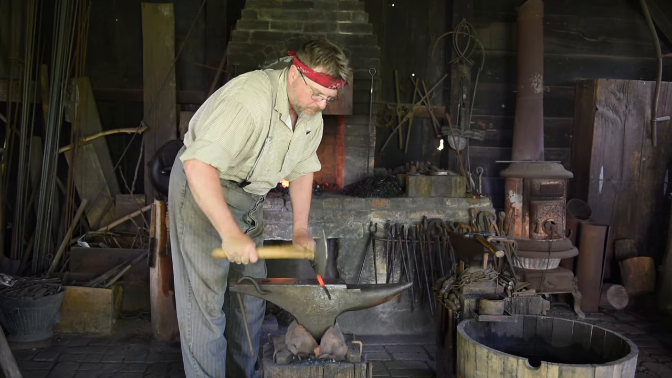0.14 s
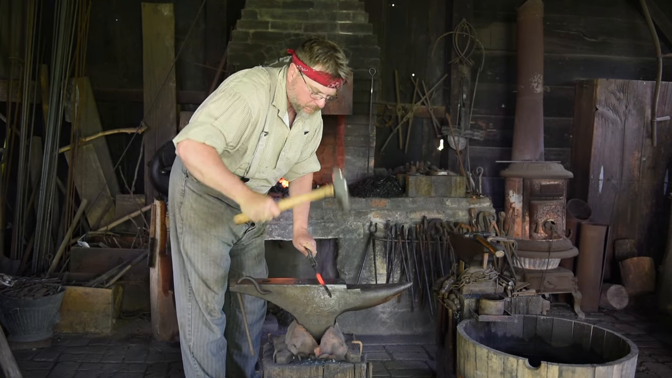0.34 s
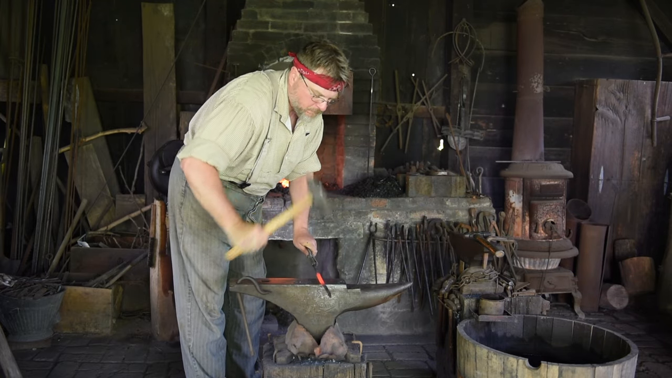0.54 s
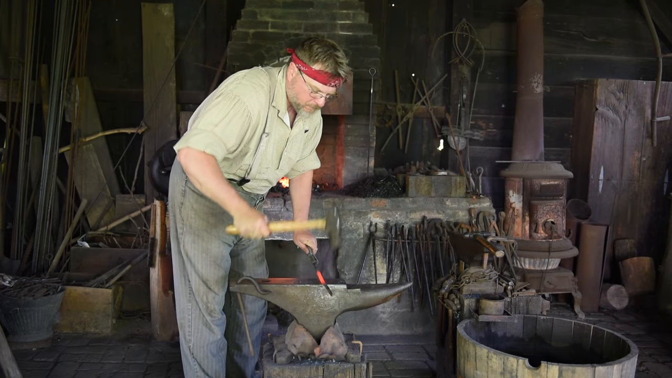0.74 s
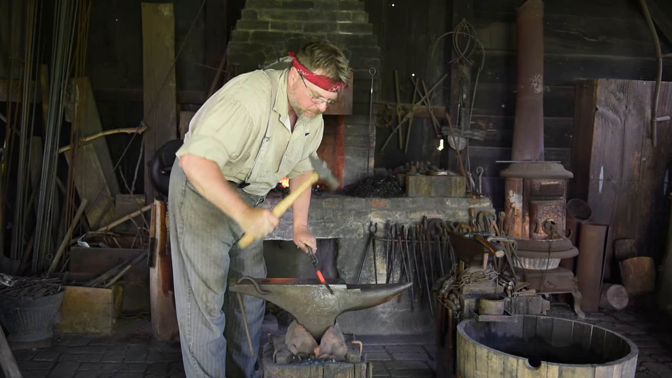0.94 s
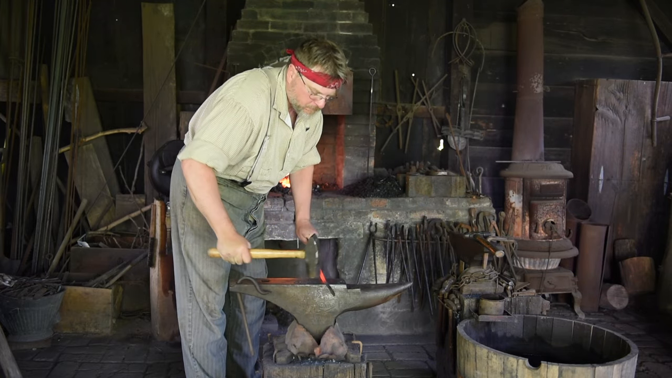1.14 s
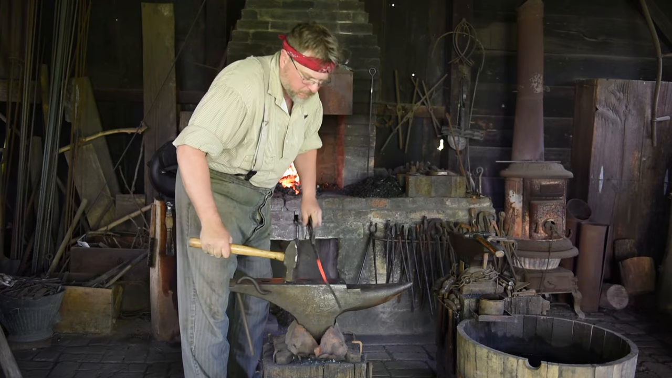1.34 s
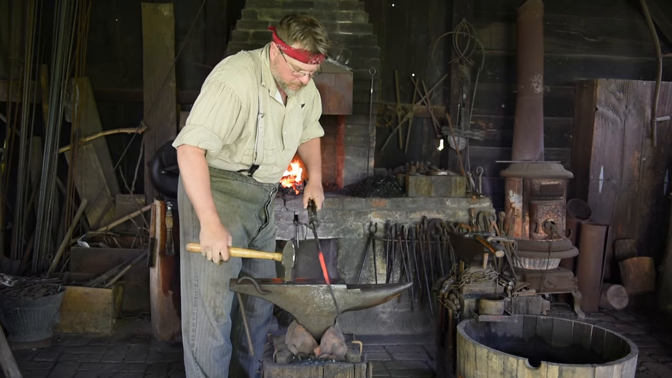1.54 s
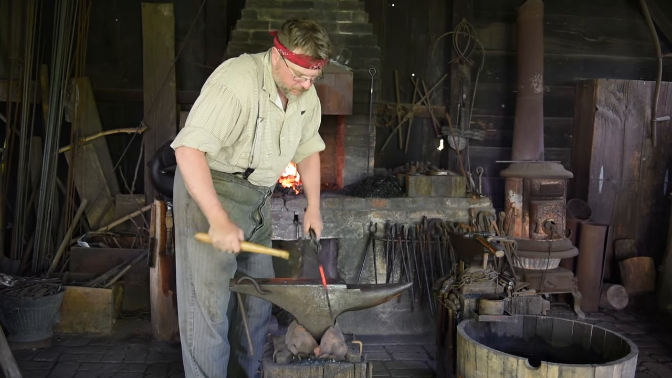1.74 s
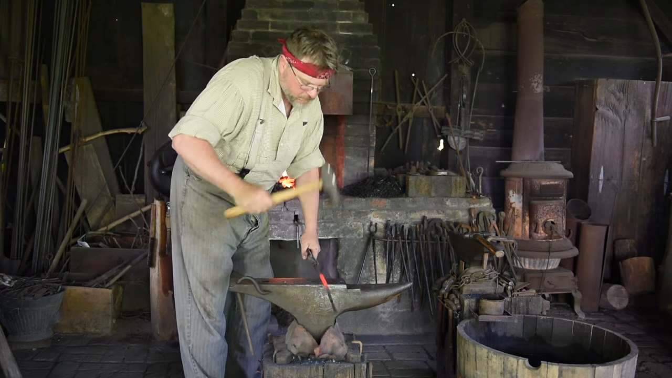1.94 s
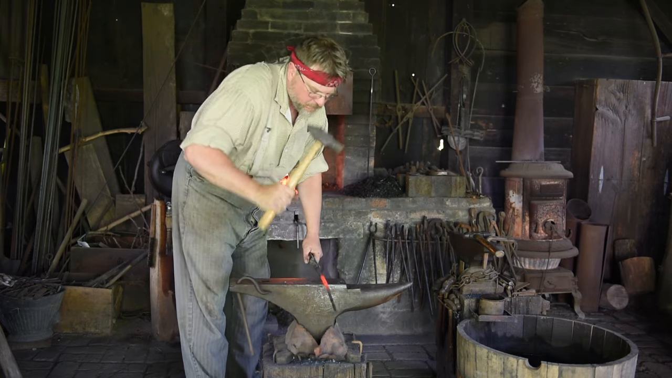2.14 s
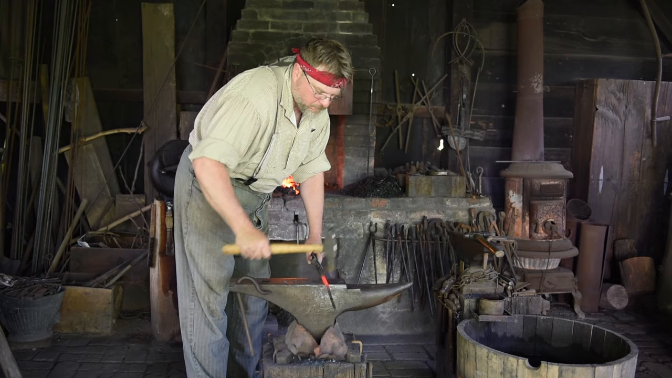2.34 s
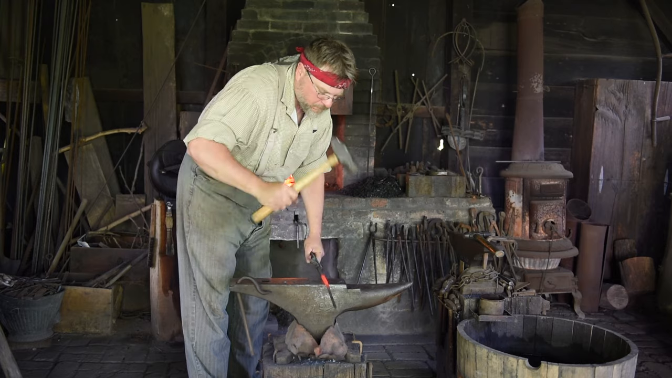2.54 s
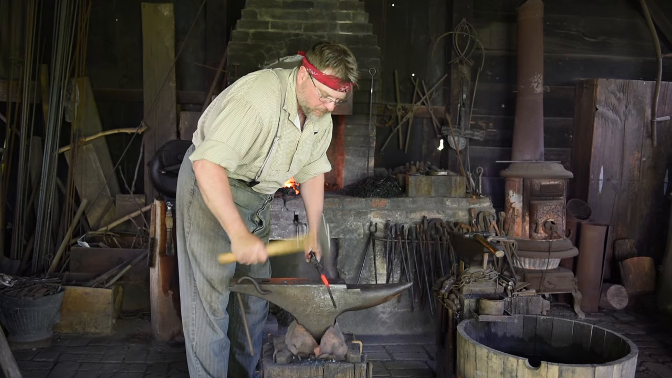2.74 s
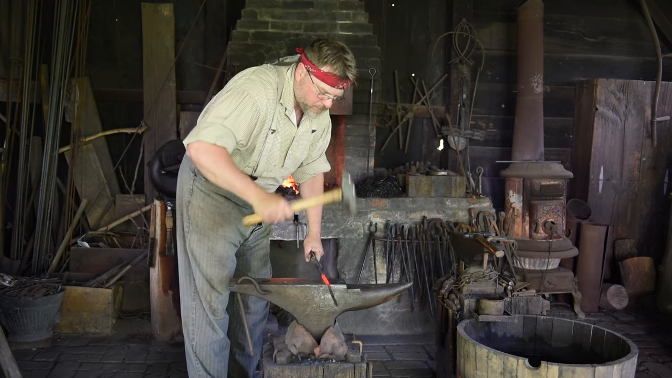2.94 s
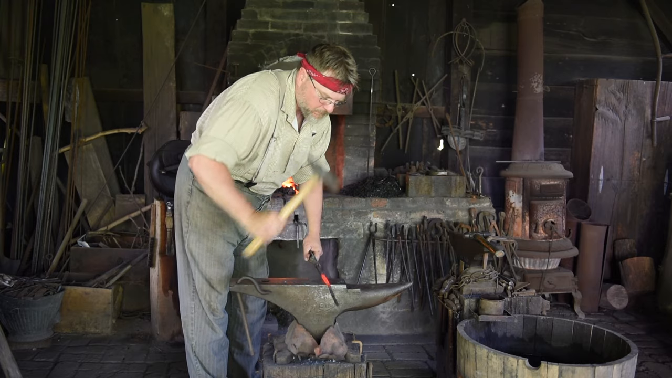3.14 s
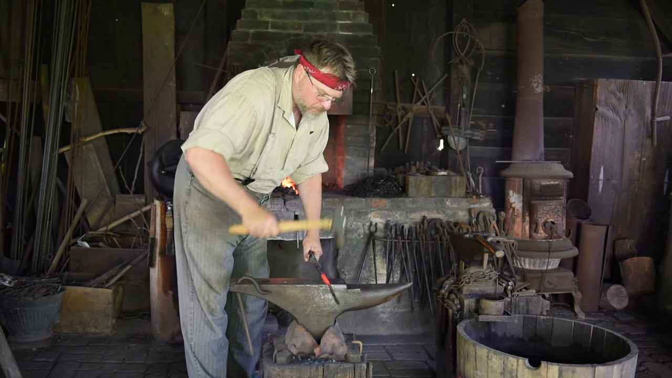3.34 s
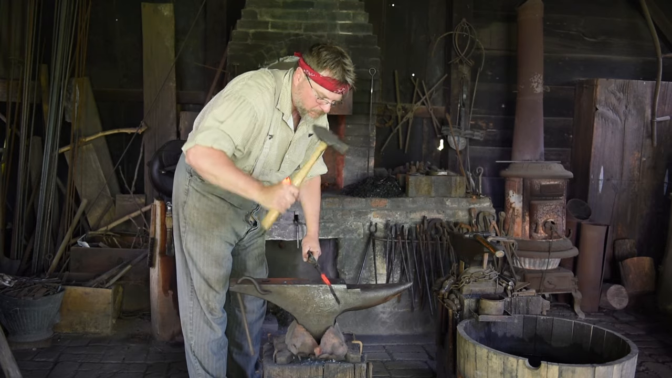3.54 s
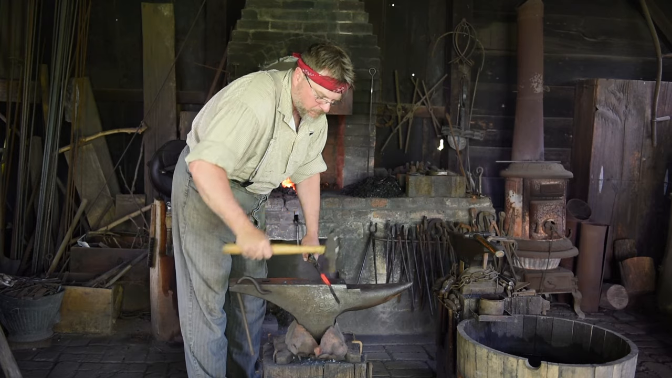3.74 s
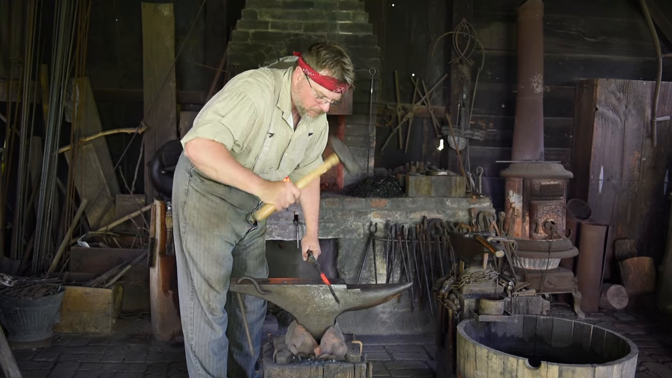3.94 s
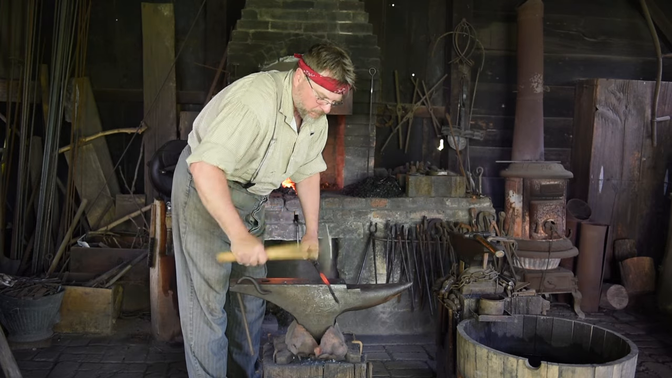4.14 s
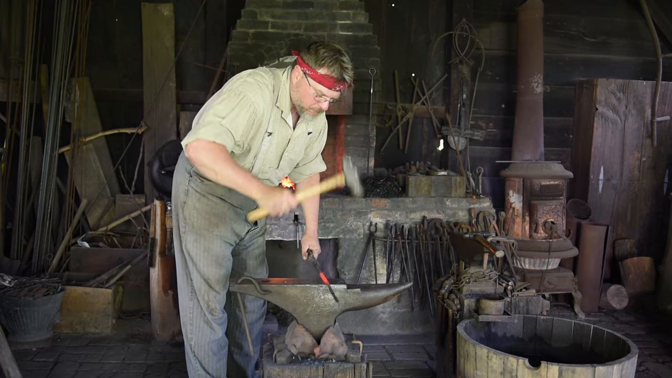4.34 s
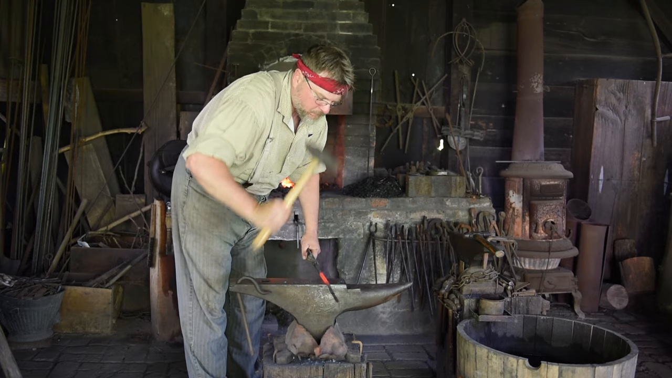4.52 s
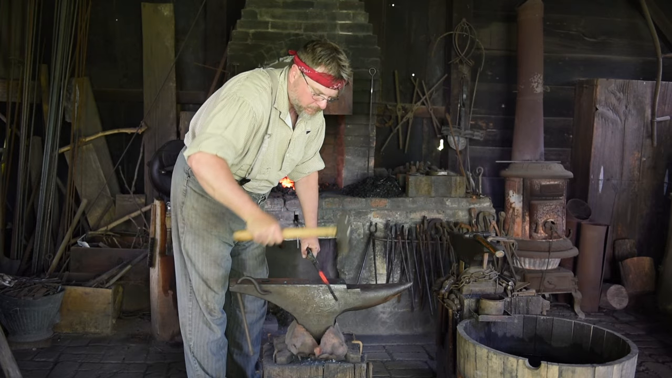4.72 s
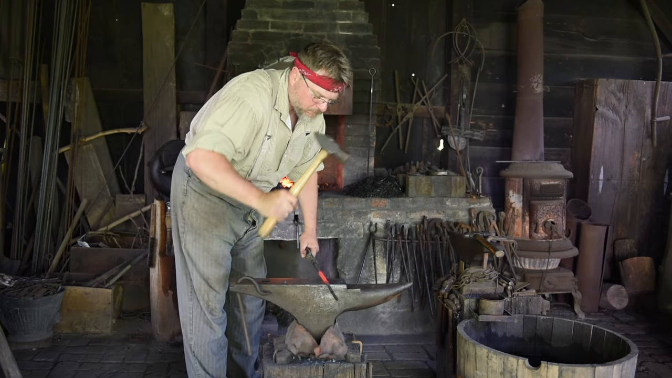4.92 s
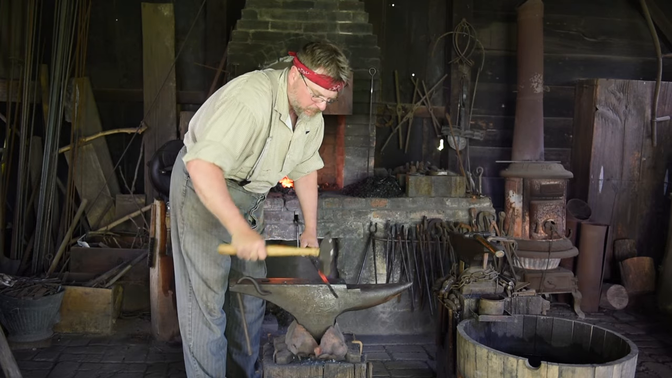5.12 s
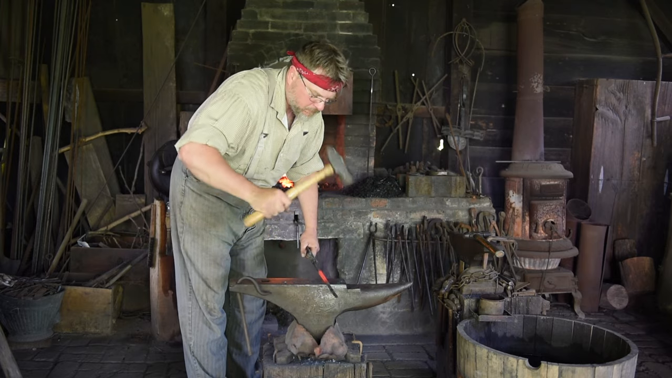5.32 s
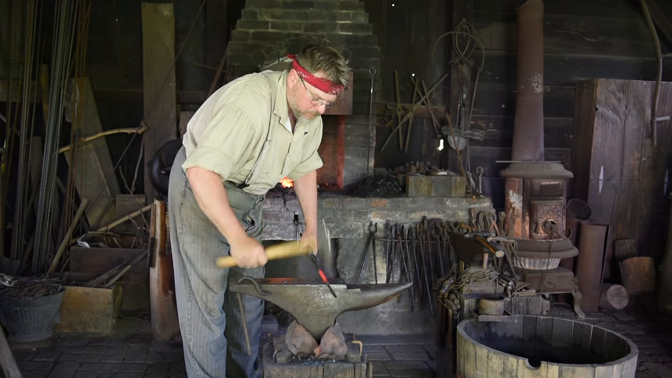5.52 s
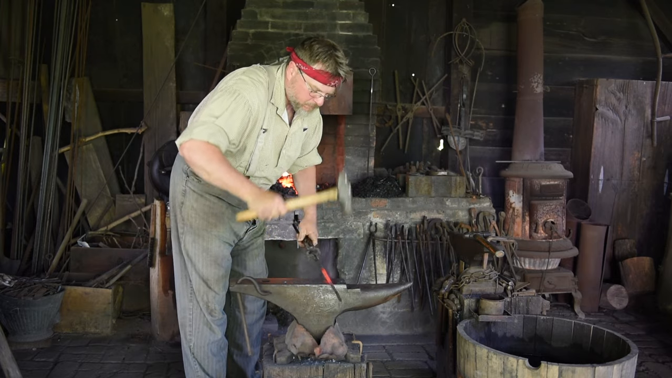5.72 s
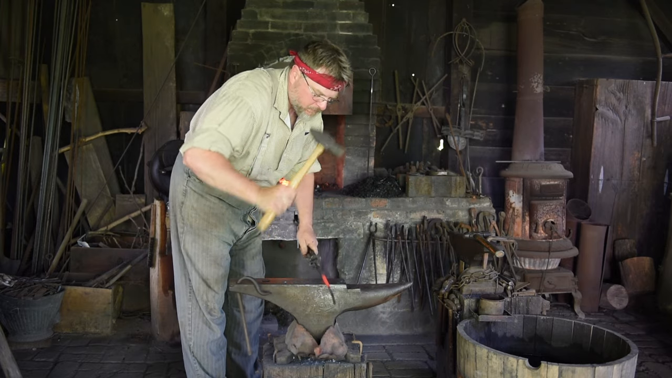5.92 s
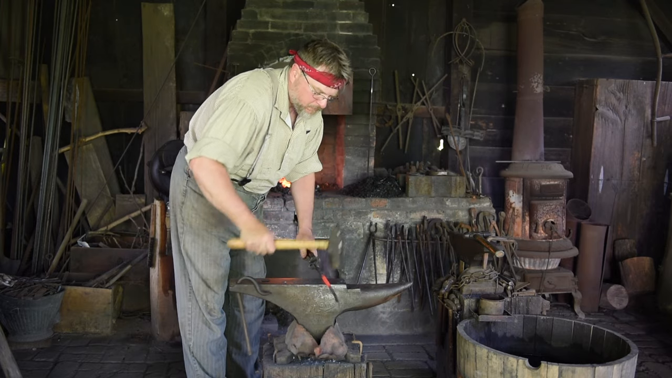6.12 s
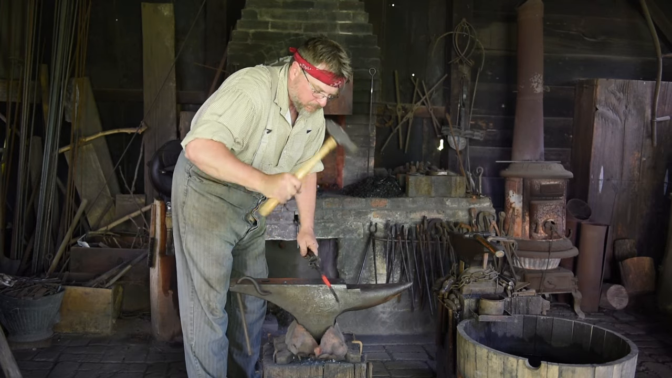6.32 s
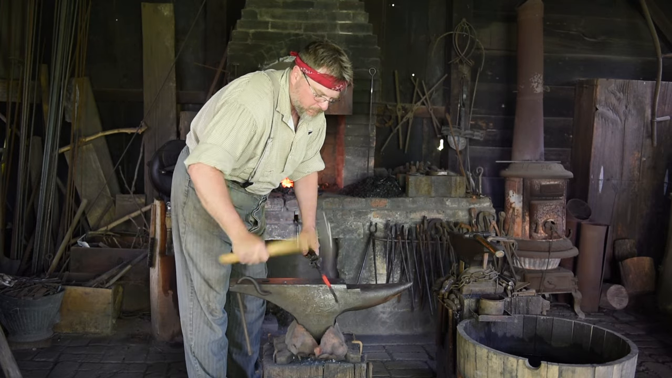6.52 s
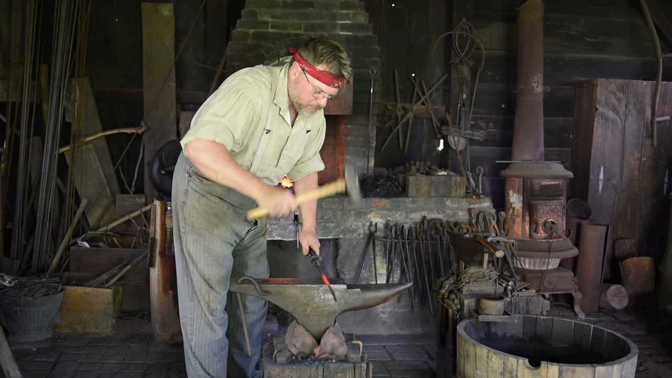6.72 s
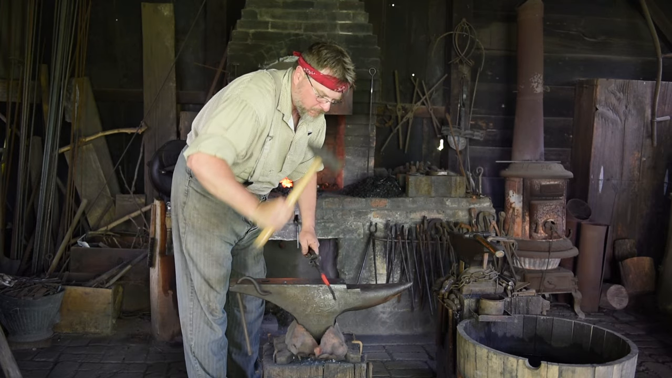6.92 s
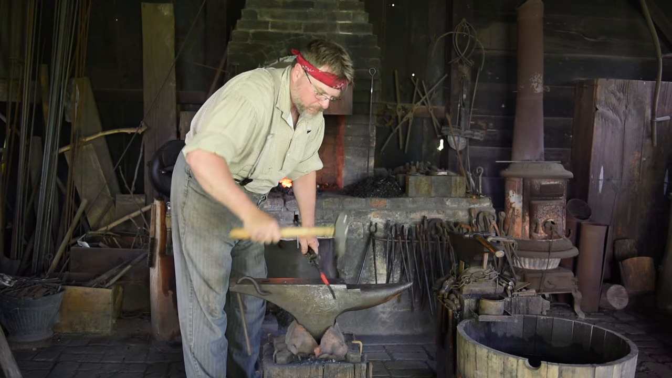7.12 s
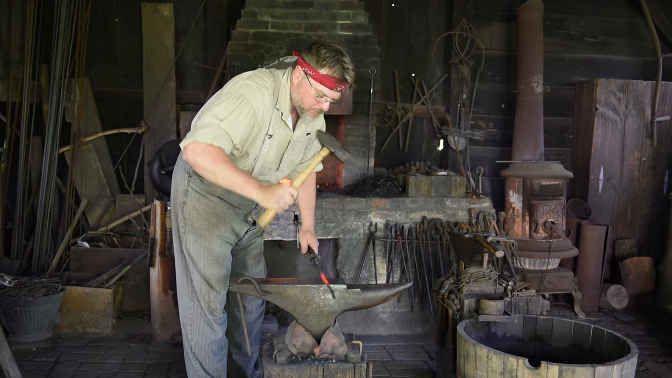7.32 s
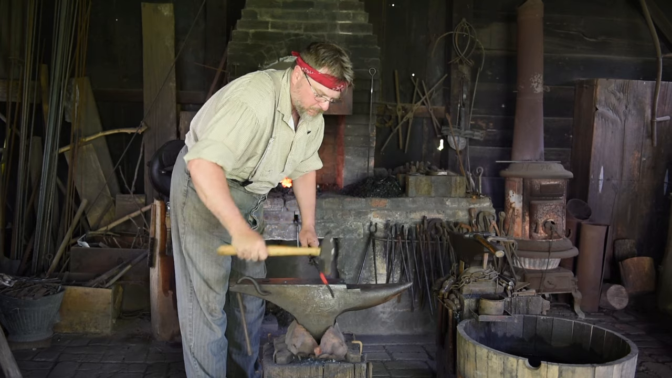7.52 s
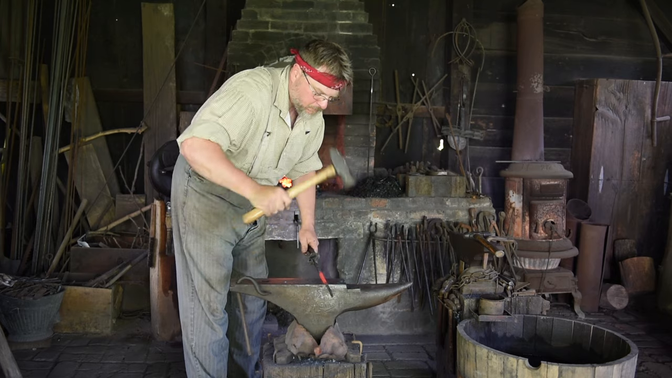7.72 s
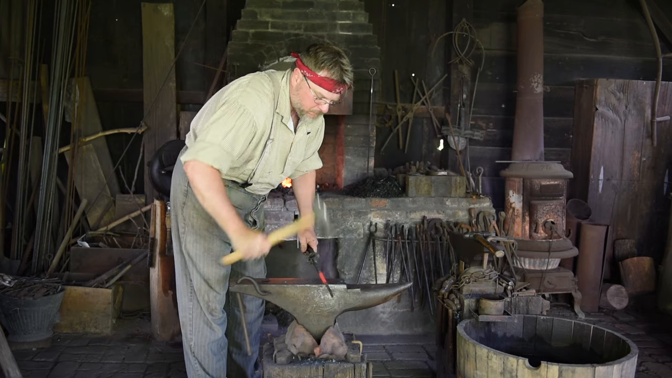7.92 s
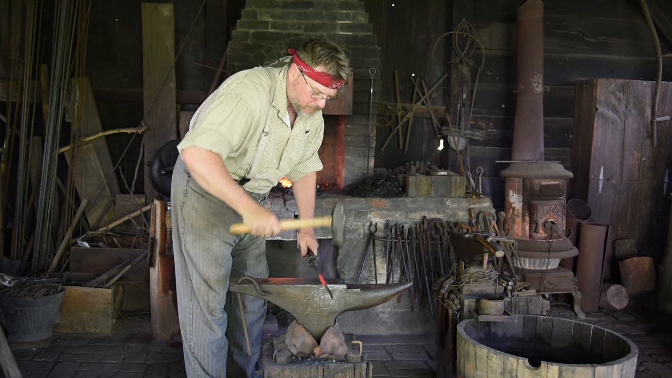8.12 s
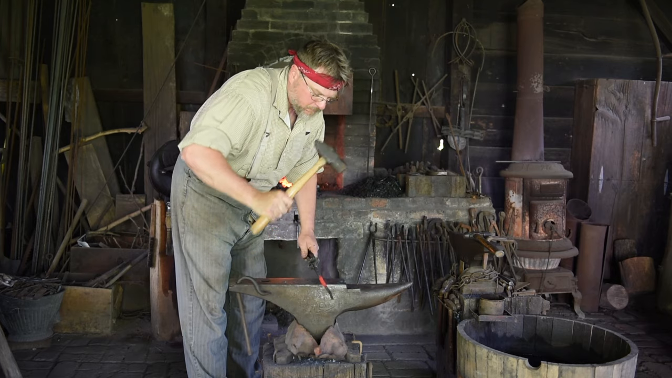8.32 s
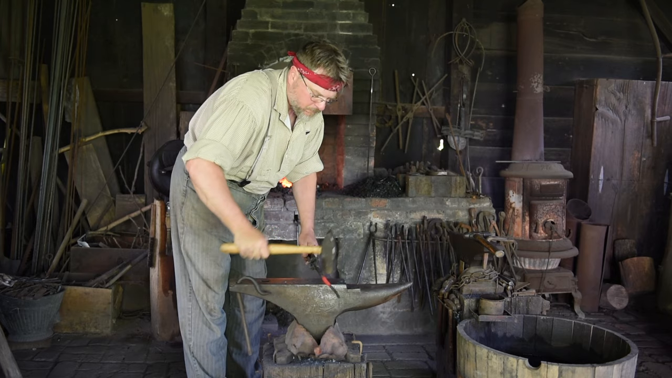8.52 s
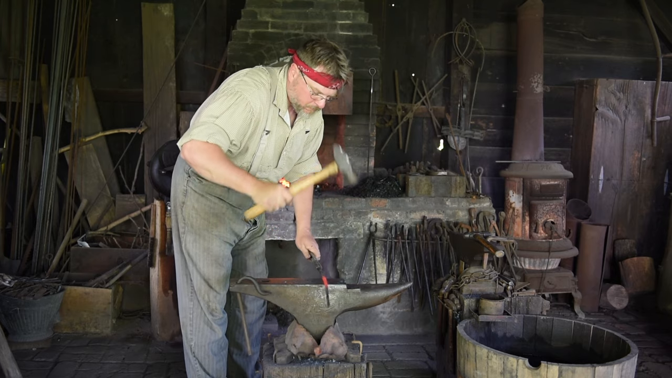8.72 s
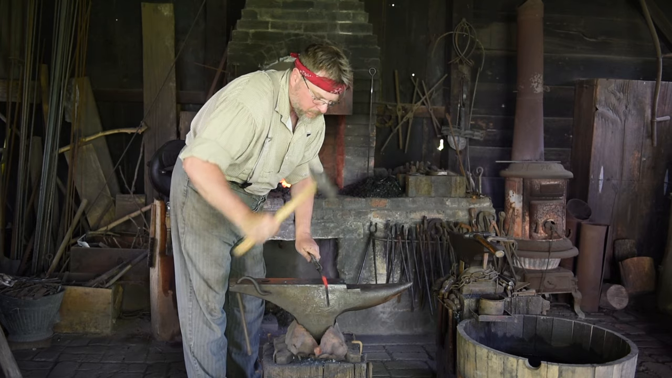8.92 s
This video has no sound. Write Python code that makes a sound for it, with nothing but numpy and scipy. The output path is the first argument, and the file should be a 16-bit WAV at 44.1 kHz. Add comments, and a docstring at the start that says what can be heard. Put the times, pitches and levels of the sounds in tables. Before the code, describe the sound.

In a timber forge, heard from nearby in stereo, a quiet fire rumbles low with a little hiss and a barely audible thin whine. At 0.2, 0.7 and 1.1 seconds a hand hammer hits hot steel on an anvil: a hard bright crack, a short low thud through the stump, and a clear ring near 1600 hertz with higher overtones, throbbing slightly and fading in about half a second. At 1.25 the hammer drops onto the anvil face and bounces in a quickening, weakening patter, its ring damped. From 1.6 to 2.0 the bar is turned with tiny knocks and a faint chime of tongs. At 2.3 full blows resume, about two per second, varying slightly in ring; those near 5.6 and 6.1 are duller. They continue to a bright last blow at 8.5, which rings out in the short room echo.

```python
"""A smith draws out a hot steel bar on an anvil in a timber forge, over the rumble of a fire (shaped noise).
Three hammer blows fall, about two a second: each cracks and echoes (decaying noise bands), thuds through
the stump (resonators) and rings anvil and hammer (decaying, beating modes).
Then the hammer bounces to rest on the anvil face; the bar is turned with small knocks and a chime of tongs.
The blows resume at the same pace and go on to the end."""
import sys
import numpy as np
from scipy import signal
from scipy.io import wavfile

SR = 44100
rng = np.random.default_rng(int(sys.argv[2]) if len(sys.argv) > 2 else 0)


def file_out(sig):
    """Save sig as 16-bit WAV at sys.argv[1]."""
    # one column per channel
    cols = np.atleast_2d(sig).T
    # limit, then scale
    lim = np.clip(cols, -1, 1)
    pcm = np.round(lim * 32767).astype(np.int16)
    wavfile.write(sys.argv[1], SR, pcm)


N = 395297
TIME = np.arange(N) / SR
STEP = 32   # samples between values of a slow control signal
SIDES = np.array([[1], [-1]])   # left, right


def from_db(db):
    """Level and amplitude: 20 dB is a factor of ten."""
    return 10 ** (np.asarray(db) / 20)


def at_hz(rows, hz):
    """Spectral interpolation: the columns of a table, read at one frequency on a logarithmic axis."""
    freqs, *columns = np.transpose(rows)
    return [np.interp(np.log(hz), np.log(freqs), column) for column in columns]


def strikes(times, sizes):
    """Impulsive excitation: a click of the given size at each time."""
    return np.bincount(np.round(np.asarray(times) * SR).astype(int), sizes, N)[:N]


def fade(x, t60):
    """Exponential decay: every click becomes a step that dies by 60 dB in t60 seconds."""
    return signal.lfilter([1], [1, -from_db(-60 / (t60 * SR))], x + 1e-18)


def wander(rate_hz, count, size):
    """Low-pass random process: rows of slow complex chance, one value every STEP samples, spread 1."""
    pole = np.exp(-2 * np.pi * rate_hz * STEP / SR)
    white = rng.standard_normal((count, size + 300, 2)) @ [1, 1j]
    slow = signal.lfilter([1], [1, -2 * pole, pole * pole], white)[:, -size:]   # drop the filter's start
    return slow / slow.std()


# Balance of the ears. Each row: frequency in Hz, level of left over right in dB.
LEANING = [(400, 0), (1500, .3), (4000, 1), (8000, 2.8), (13000, 1.5)]


def lean(hz):
    """Interaural level difference: the gains of left and right at one frequency."""
    return from_db(at_hz(LEANING, hz)[0] / 2 * SIDES)


# Likeness of the two ears' noise. Each row: frequency in Hz, likeness from 0 (unrelated) to 1 (alike).
EAR_LIKENESS = [(330, 1), (550, .96), (1000, .75), (2000, .35), (5000, .25), (12000, .2)]
BAND_EDGES_HZ = np.geomspace(175, 16550, 26) - 150


def banded_noise(level_at, white_at):
    """Band filtering of stereo noise: level_at(hz) is height per root Hz, white_at(k, hz) mid and side noise."""
    out = np.zeros((2, N))
    for k, (low, high) in enumerate(zip(BAND_EDGES_HZ, BAND_EDGES_HZ[1:])):
        hz = np.sqrt(low * high)
        alike = np.clip(at_hz(EAR_LIKENESS, hz)[0], 0, 1)
        bandpass = signal.butter(2, [low, high], "band", fs=SR, output="sos")
        band = signal.sosfilt(bandpass, white_at(k, hz) * level_at(hz))
        ears = np.array([[1, 1], [1, -1.24]]) * np.sqrt([1 + alike, 1 - alike])
        out += (ears * lean(hz)) @ band
    return out * np.sqrt(SR) / 2


# Spectrum of the hearth; only its shape counts. Each row: frequency in Hz, relative level in dB per Hz.
FIRE_SPECTRUM = [(15, -43), (25, -12), (70, -1.5), (123, -2), (190, -15.5), (229, -10), (249, -13.5),
                 (796, -24), (1020, -24), (1260, -24), (6560, -31), (10500, -31), (14000, -48.5),
                 (16000, -61)]


def fire(roar_db=-49.5, whine_hz=996, whine_db=-69):
    """Broadband turbulence: the hearth rumbles and hisses, with a thin whine that wavers in level."""
    white = rng.standard_normal((2, 2, N))
    # neighbouring bands draw on different noise
    roar = banded_noise(lambda hz: from_db(at_hz(FIRE_SPECTRUM, hz)[0]), lambda k, hz: white[k % 2])
    slow = abs(wander(3.0, count=1, size=N // STEP + 2)[0])
    waver = np.interp(np.arange(N) / STEP, np.arange(len(slow)), slow)
    whine = waver * np.sin(2 * np.pi * whine_hz * TIME)
    return from_db(roar_db) * roar / roar.std() + from_db(whine_db) * whine


# Full blows, all equally hard. Each row: start in seconds, anvil ring in dB (more when the bar lies flat),
# spot along the face (no unit), hammer ring in dB.
BLOWS = [(0.2059, -0.5, 0.62, -1.5), (0.6621, 2.5, 0.23, 2), (1.1137, -0.5, 0.2, 5.5), (2.3436, 1, 0.29, 3),
         (2.8166, -2.5, -1.74, 0.5), (3.2787, 0.5, -0.56, 2.5), (3.7504, 1.5, 0.65, -1),
         (4.2087, 4.5, 0.14, 4.5), (4.6798, 3.5, 0.87, 5), (5.133, 1.5, 0.96, 2),
         (5.5961, -14.5, -0.49, -1), (6.116, -7.5, 0.57, 5.5), (6.5977, 2.5, 0.42, 1),
         (7.0819, 4, -0.15, 3.5), (7.5431, 2, 0.43, 1.5), (8.0231, 0, -0.24, -2), (8.5297, 8, 1, 3.5)]
CRACK_DB, CRACK_FOLLOWS = 3, 1.7   # treble of a crack at full force; dB it loses per dB of force lost
# after the third blow the hammer falls and bounces, each hop shorter and weaker than the last
DROP_S, FIRST_HOP_S, HOP_RATIO = 1.2531, 0.076, 0.47
DROP_FORCE_DB, HOP_LOSS_DB = -8, 4.5
DROP_ANVIL_DB, DROP_HAMMER_DB, HOP_RING_LOSS_DB = 5, 3.5, 7.5


def contacts(count=5, glance_share=0.14):
    """Inelastic rebound: blows and bounces as columns s, force, crack treble, anvil ring, spot, hammer ring."""
    rows = [(s, 0, anvil_db, spot, hammer_db) for s, anvil_db, spot, hammer_db in BLOWS]
    s = DROP_S
    for k in range(count):
        force_db = DROP_FORCE_DB - k * HOP_LOSS_DB
        lost_db = k * HOP_RING_LOSS_DB
        rows.append((s, force_db, DROP_ANVIL_DB - lost_db, 0, DROP_HAMMER_DB - lost_db))
        s += FIRST_HOP_S * HOP_RATIO ** k
    times, force_db, anvil_db, spot, hammer_db = np.transpose(sorted(rows))
    # a blow that rings less cracks more
    crack_db = CRACK_DB + CRACK_FOLLOWS * force_db - glance_share * anvil_db
    return times, force_db, crack_db, anvil_db, spot, hammer_db


# Noise of a blow. Each row: frequency in Hz, room tail in dB per Hz, tail t60 in seconds,
# crack in dB over the tail, first echo in dB over the tail.
IMPACT = [(35, -83.5, .6, 4.5, -12.5), (69.5, -56.5, 0.6, -1, -12.5), (122, -47, 0.51, -11.5, 0),
          (233.5, -43, 0.56, 16, -14.5), (380, -52, 0.49, 14.5, -16.5), (1188, -51.5, 0.47, 21, -26.5),
          (2300, -56, 0.42, 15, -0.5), (3500, -60, 0.49, 23, -6.5), (4810, -63.5, 0.49, 13, -12),
          (7500, -63, 0.46, 12.5, 17.5), (10130, -57, 0.38, 20, 5.5), (11060, -82.5, 0.43, 19, 21.5),
          (14500, -74.5, .24, 18.5, 23)]
# Small sounds of tongs and bar on the anvil. Each row: start in seconds, level in dB against a blow
# before the common lift shift_db, length in seconds, centre frequency in Hz.
SHIFTS = [(1.078, -31, 0.0034, 5000), (1.326, -16, .11, 2480), (1.578, -35, 0.21, 5010),
          (1.854, -39, 0.25, 5430), (3.6306, -9, 0.00079, 3300), (6.88, -28, 0.023, 7900)]
ECHO_S = 0.01   # delay of the first reflection


def impacts(crack_s=0.012, thud_cycles=1.1, echo_t60=0.0041, shift_db=2.0):
    """Direct sound, first reflection and reverberation: cracks and small shifts of the bar in one room."""
    times, force_db, bright_db = contacts()[:3]
    starts = np.round(times * SR).astype(int)
    last_start = np.r_[0, starts][np.searchsorted(starts, np.arange(N), "right")]
    since_blow = np.arange(N) - last_start
    new = rng.standard_normal((2, 2, N))
    repeated = rng.standard_normal((2, 2, N))[..., since_blow]   # the same noise after every contact

    def white_at(k, hz):
        # long waves take the same paths after every blow; short ones change with the spot that is struck
        same = np.interp(hz, [300, 3000], [.7, .1])
        return np.sqrt(same) * repeated[k % 2] + np.sqrt(1 - same) * new[k % 2]

    def level_at(hz):
        tail_db, t60, crack_db, echo_db = at_hz(IMPACT, hz)
        treble_share = np.interp(hz, [1500, 7000], [0, 1])
        power = from_db(force_db + (bright_db - force_db) * treble_share) ** 2
        hits = strikes(times, power)
        snap = power * from_db(force_db)   # light taps hardly crack
        # powers add, and die twice as fast as heights; low notes take longer to stop
        direct = from_db(crack_db) ** 2 * fade(strikes(times, snap), (crack_s + thud_cycles / hz) / 2)
        echo = from_db(echo_db) ** 2 * fade(strikes(times + ECHO_S, snap), echo_t60 / 2)
        rub = np.zeros(N)
        for s, db, length, centre_hz in SHIFTS:
            octaves_off = np.log2(hz / centre_hz)
            rub[int(s * SR):int((s + length) * SR)] += from_db(db + shift_db - 4.6 * octaves_off ** 2) ** 2
        tail = fade(hits + rub / (0.12 * SR), t60 / 2)
        return from_db(tail_db) * np.sqrt(direct + echo + rub + tail)
    return banded_noise(level_at, white_at)


# Stump and floor. Each row: frequency in Hz, level in dB, t60 in seconds.
STUMP_MODES = [(55.5, -35, 0.22), (68.14, -29.5, 0.56), (101.6, -19.5, 0.29), (118.7, -28.5, 0.76),
               (139, -38, 0.92), (158, -46.5, 1), (218.6, -28.5, 0.34), (244, -41, 0.17),
               (255.4, -29, 0.58), (296.5, -25, 0.33), (360.4, -33, 0.57), (550.4, -24.5, 0.26),
               (634, -32.5, 0.45), (746, -40.5, 0.53), (985, -32, 0.37), (1040, -35, 0.49)]


def stump():
    """Resonance under impulse: the blow drives the anvil into its stump, which thuds alike every time."""
    times, force_db = contacts()[:2]
    push = strikes(times, from_db(force_db)) + 1e-18
    out = 0
    for k, (hz, db, t60) in enumerate(STUMP_MODES):
        r, w = from_db(-60 / (t60 * SR)), 2 * np.pi * hz / SR
        mode = signal.lfilter([0, np.sin(w)], [1, -2 * r * np.cos(w), r * r], push)
        out = out + (-1) ** k * from_db(db) * mode   # neighbours in opposite phase
    return out


RING_FRAMES = 1000   # length of every ring, in blocks of STEP samples
TWIN_BELOW_HZ = 9.7


def ring(times, levels_db, hz, t60, spread, scatter, scatter_hz, fresh, swell_s, twin=0):
    """Modal decay in a reverberant field: reflections build a mode up and make it beat at each ear."""
    age = np.arange(RING_FRAMES + 1) * STEP / SR
    shape = from_db(-60 * age / t60) - from_db(-60 * age / swell_s)
    chance = wander(scatter_hz, count=2 * len(times) + 2, size=len(age)).reshape(-1, 2, len(age))
    # chance[0] is common to all contacts; fresh is the share that is new at each
    field = (chance[0] + fresh * chance[1:]) / np.hypot(1, fresh)
    direct = np.exp(.5j * spread * SIDES)
    lower_twin = twin * np.exp(-2j * np.pi * TWIN_BELOW_HZ * age)
    path = shape * (direct - lower_twin + scatter * field)
    # the room moves energy about but adds none
    path *= np.linalg.norm(shape) / np.linalg.norm(path, axis=-1, keepdims=True)
    path *= lean(hz)
    # the sine is built block by block, gliding from one path value to the next
    start = np.exp(2j * np.pi * hz * age[:-1])
    within = np.arange(STEP)
    ends = np.stack([path[..., :-1] * start, np.diff(path) * start], -1)
    glide = np.exp(2j * np.pi * hz * within / SR) * [within ** 0, within / STEP]
    out = np.zeros((2, N + RING_FRAMES * STEP))
    for s, db, end in zip(times, levels_db, ends):
        at = round(s * SR)
        out[:, at:at + RING_FRAMES * STEP] += (from_db(db) * end @ glide).real.reshape(2, -1)
    return out[:, :N]


# Anvil pitches, five main modes first, then overtones. Each entry: frequency in Hz.
ANVIL_HZ = [1620.6, 1801.7, 3189.4, 4098.8, 4791.3, 2966, 3526, 3703, 5865, 6053, 6220.5, 7124, 7845, 9225,
            9418, 9778, 11108, 11385, 11794, 13130, 13270]
# Anvil modes in the same order. Each row: level in dB before the response to the contact,
# t60 in seconds, left-right phase in radians.
ANVIL_MODES = [(2.2, .44, 2.1), (-23.5, .72, -.2), (-18, .47, -1.1), (-24, .43, .6), (-22.5, .47, -.8),
               (-27, .52, .4), (-38, .56, .1), (-33.5, .52, .1), (-39, .5, 0), (-34, .5, 0),
               (-29.5, .52, .1), (-30, .53, 1.9), (-33, .45, 1.4), (-28, .4, .7), (-28, .35, .9),
               (-31, .44, .8), (-36, .43, .1), (-44, .45, .2), (-34, .37, .3), (-43, .42, .5),
               (-46, .4, .5)]
# Response of the five main modes, then of all overtones, to a contact. Each row: dB per dB of force,
# dB per dB of anvil ring, dB per unit of spot, dB per dB of hammer ring, constant in dB.
RESPONSE = [(3.3, .2, -1, 0, 3.0), (3.2, .1, 5, 0, 3.4), (.9, 0, 0, 1.2, -3), (3.3, .2, 9.5, 0, 2.6),
            (.8, 1.1, 0, 0, -1.8), (.7, .9, 1.5, 0, -.3)]
# The hammer lies on the anvil face. The pair: laid in seconds, lifted in seconds.
HAMMER_RESTS = (1.26, 2.33)
# the lowest and loudest mode has a weaker twin just below it, so its note throbs from ear to ear
TWIN_DB, KEYNOTE_PAN_DB = -9, 1.9


def anvil(damping_db_per_s=70, main_chance_db=1.0, overtone_chance_db=2.0):
    """Modal excitation and damping: the spot struck weights the modes; a hammer laid on the face stills them."""
    times, force_db, _, anvil_db, spot, hammer_db = contacts()
    causes = [force_db, anvil_db, spot, hammer_db, np.ones(len(times))]
    *mains, overtones = np.array(RESPONSE) @ causes
    db, t60, spread = ANVIL_MODES[0]
    keynote = ring(times, db + mains[0], ANVIL_HZ[0], t60, spread, scatter=.4, scatter_hz=9,
                   fresh=1, swell_s=.3, twin=from_db(TWIN_DB))
    out = keynote * from_db(KEYNOTE_PAN_DB / 2 * SIDES)
    for k in range(1, len(ANVIL_MODES)):
        hz = ANVIL_HZ[k]
        db, t60, spread = ANVIL_MODES[k]
        chance = rng.standard_normal(len(times))
        if k < len(mains):
            blow_db = mains[k] + main_chance_db * chance
        else:
            blow_db = overtones + overtone_chance_db * chance
        out = out + ring(times, db + blow_db, hz, t60, spread, scatter=0.85 * np.sqrt(hz / 3000),
                         scatter_hz=8.4 + hz / 1500, fresh=0.3, swell_s=0.033)
    laid, lifted = HAMMER_RESTS
    return out * from_db(-damping_db_per_s * np.maximum(TIME - laid, 0) * (TIME < lifted))


# Pitches of the hammer head and the bar under it. Each entry: frequency in Hz.
HAMMER_HZ = [1555, 1668, 2995, 3030, 3110, 4408, 4585, 5673, 6882, 7695, 8910, 9010, 10583, 12596, 15380]
# Hammer modes in the same order. Each row: level in dB before the blow's own level and the common lift
# level_db, t60 in seconds.
HAMMER_MODES = [(-22.5, 0.32), (-21.5, 0.48), (-21, 0.31), (-23.5, 0.39), (-32, 0.54), (-35.5, 0.51),
                (-42.5, 0.57), (-31.5, 0.43), (-32.5, 0.35), (-27, 0.38), (-31.5, 0.21), (-26.5, 0.3),
                (-29, 0.38), (-36.5, 0.34), (-53.5, .2)]


def hammer(level_db=2.5):
    """Diffuse reverberation: the hand damps the head at once; the room carries its notes on as blurred bands."""
    times, _, bright_db, _, _, ring_db = contacts()
    out = 0
    for hz, (db, t60) in zip(HAMMER_HZ, HAMMER_MODES):
        driven_db = ring_db if hz < 4000 else bright_db   # high notes follow the crack
        blow_db = driven_db + level_db + rng.normal(0, 2.5, len(times))
        out = out + ring(times, db + blow_db, hz, t60, 0, scatter=3.5, scatter_hz=21.0 + hz / 350,
                         fresh=4.2, swell_s=0.0061)
    return out


# Touches as the tongs are gripped anew. Each row: start in seconds, level in dB added to every mode.
GRIPS = [(1.575, -2.5), (1.69, 1), (1.85, -12), (1.96, -16)]
# Modes of the tongs. Each row: frequency in Hz, level in dB before the touch's own, t60 in seconds.
TONGS_MODES = [(2135, -52, 1.1), (3750, -66, 1.1), (5200, -63, 1.3)]


def tongs():
    """Lightly damped bar modes: a faint chime of the tong reins."""
    times, grip_db = np.transpose(GRIPS)
    out = 0
    for hz, db, t60 in TONGS_MODES:
        out = out + ring(times, db + grip_db, hz, t60, 0, scatter=.8, scatter_hz=6.0, fresh=1.5, swell_s=0.12)
    return out


def scene():
    """Superposition: the treble of steel leans a little to the left; thud and rumble fill the middle."""
    return fire() + impacts() + stump() + anvil() + hammer() + tongs()


def record(dry, top=0.89, mono_below_hz=420, cutoff_hz=15900):
    """Saturation and band limiting: cracks overload the microphone, its sides share the bass, the top is cut."""
    left, right = dry / (1 + (dry / top) ** 4) ** (1 / 4)
    highpass = signal.butter(2, mono_below_hz, "high", fs=SR, output="sos")
    side = signal.sosfiltfilt(highpass, (left - right) / 2)
    both = (left + right) / 2 + side * SIDES
    lowpass = signal.ellip(10, .2, 70, cutoff_hz, fs=SR, output="sos")
    return signal.sosfilt(lowpass, both)


dry = scene()
out = record(dry)
file_out(out)
```